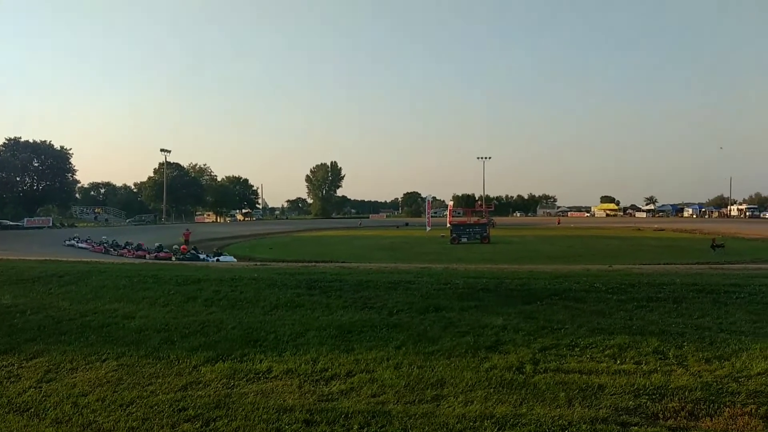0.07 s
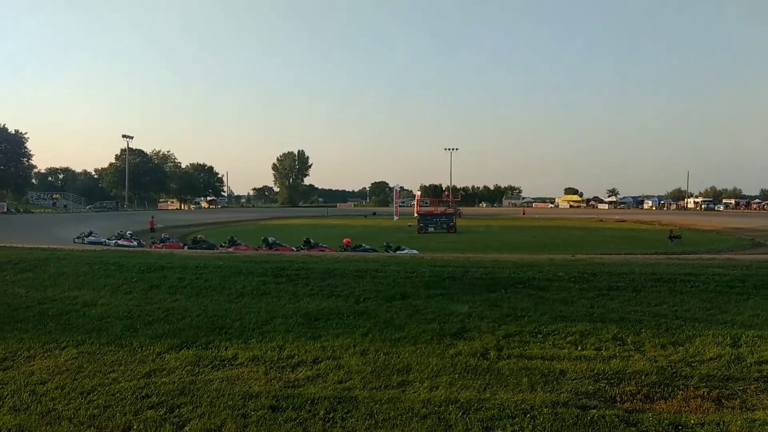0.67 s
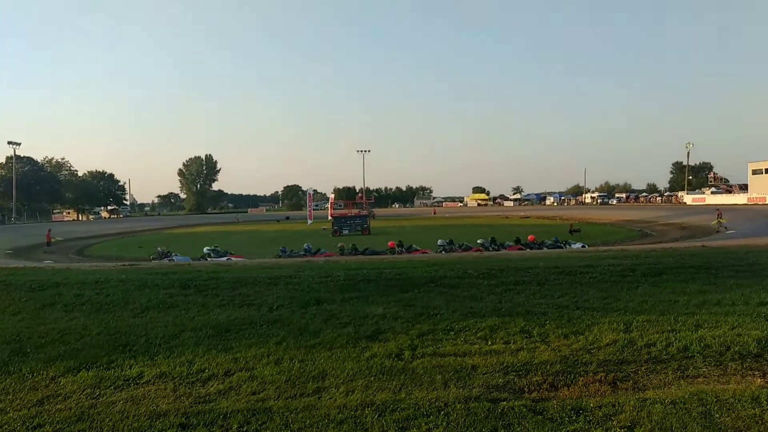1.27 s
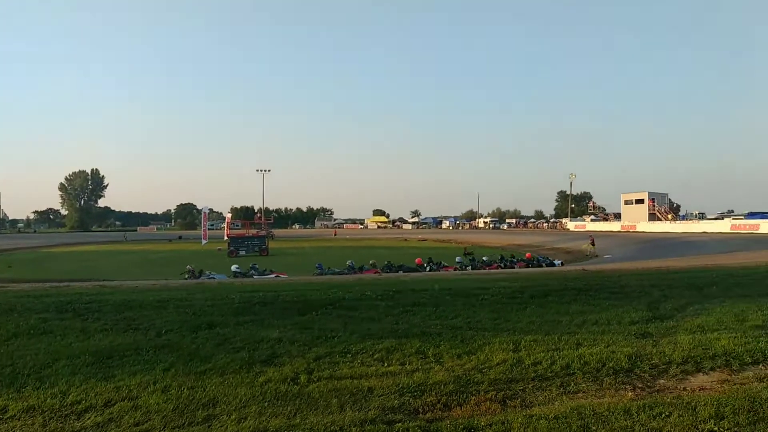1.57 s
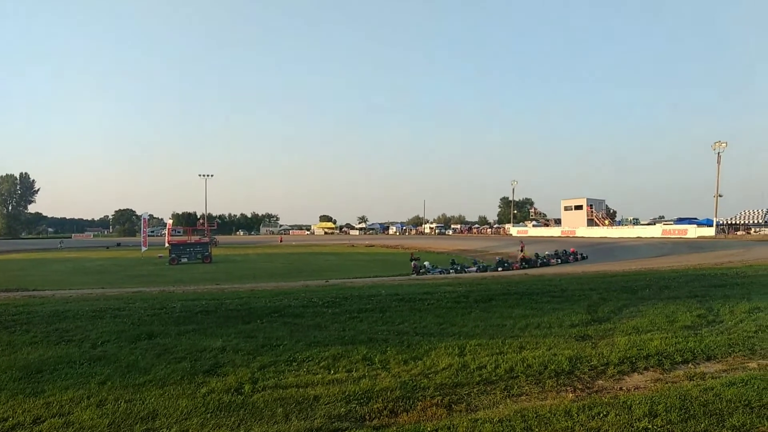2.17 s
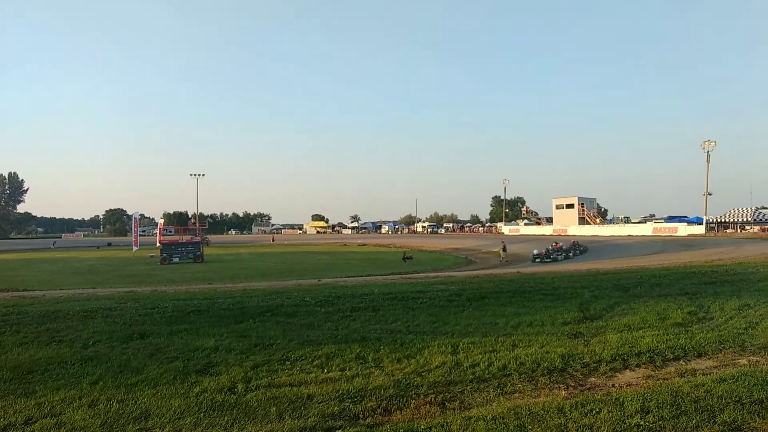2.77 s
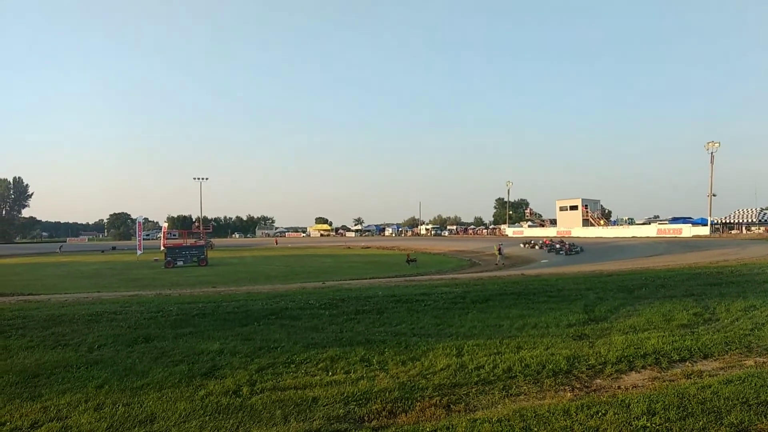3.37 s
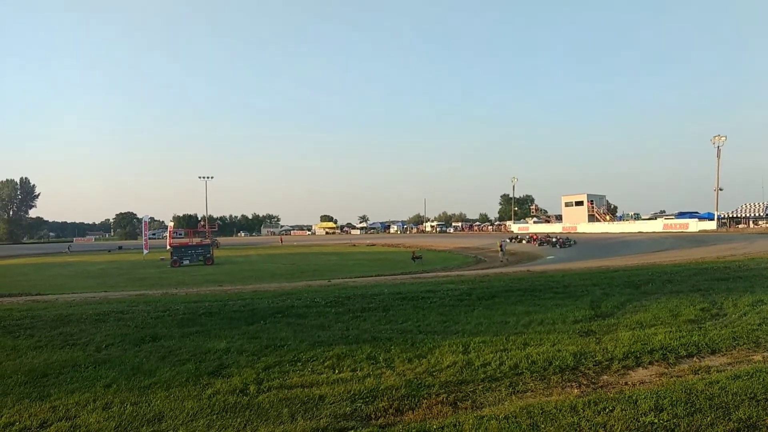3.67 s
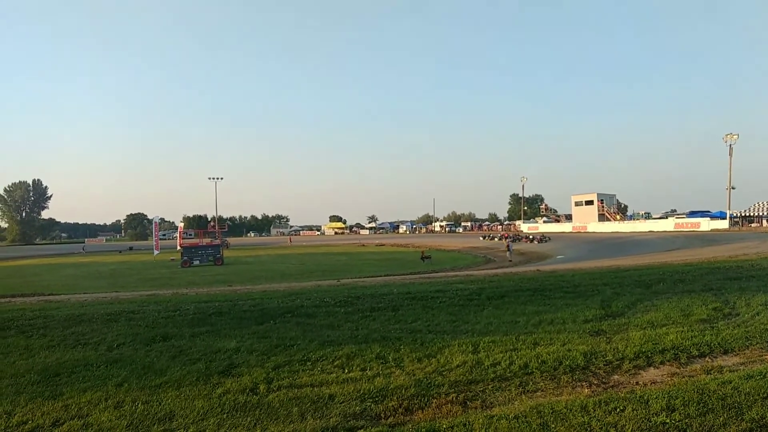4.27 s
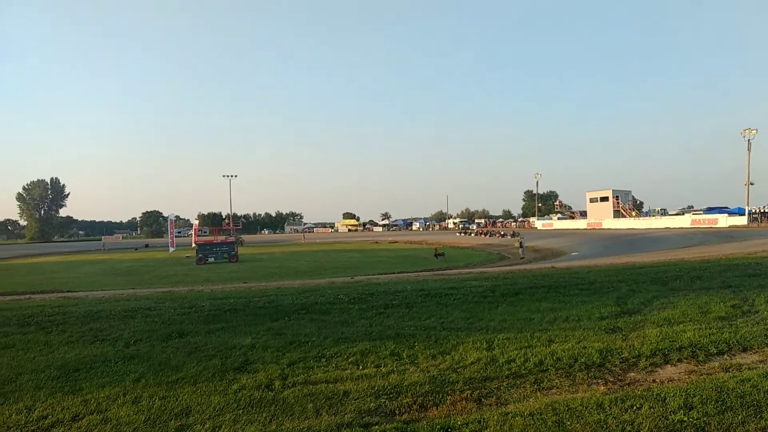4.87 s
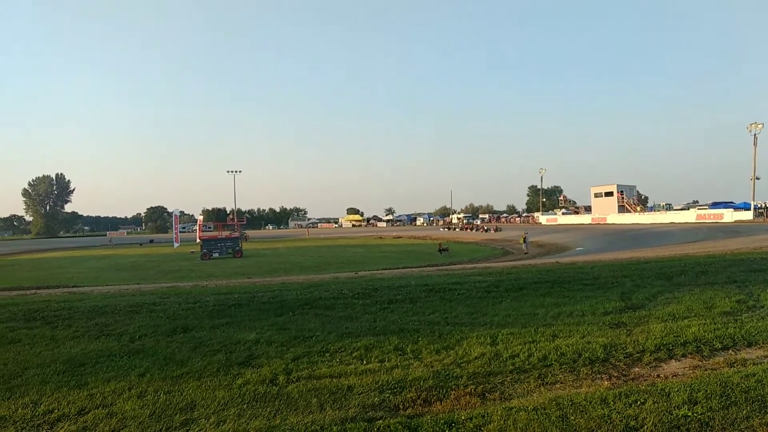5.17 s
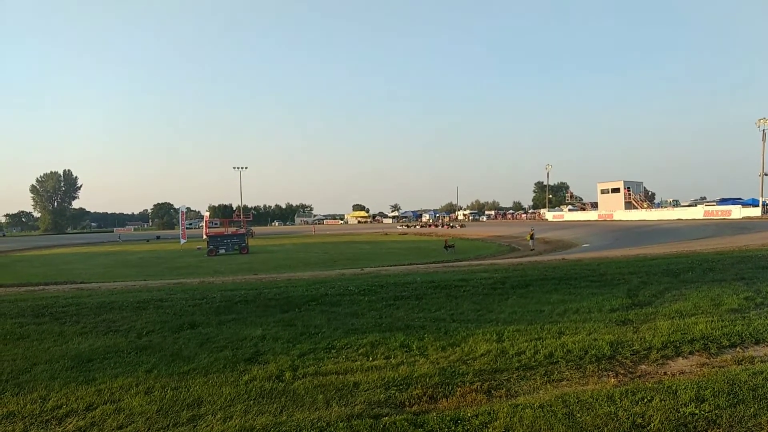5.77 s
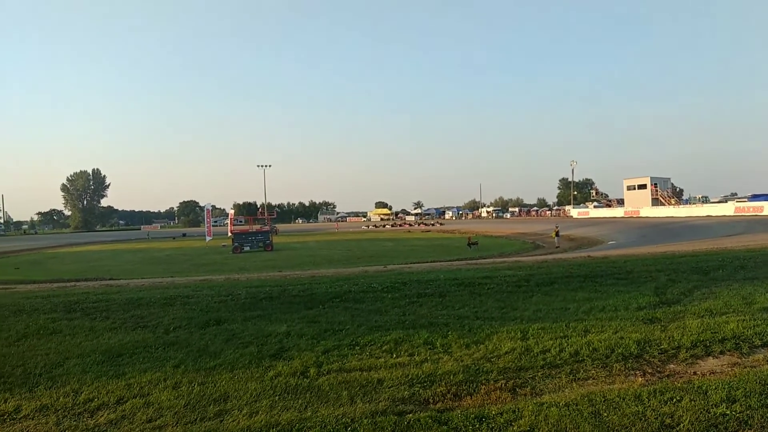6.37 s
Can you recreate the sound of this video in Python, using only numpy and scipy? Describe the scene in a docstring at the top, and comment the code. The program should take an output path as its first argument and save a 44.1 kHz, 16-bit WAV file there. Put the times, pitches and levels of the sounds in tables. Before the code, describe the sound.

A pack of small racing karts drones and throbs past outdoors, fades briefly in a turn, then speeds up farther away.

```python
"""On the grass outside a dirt oval, two closely spaced microphones hear a pack of racing karts pass,
round the turn and speed up on the far straight. Each single-cylinder four-stroke engine emits a pulse
train; their harmonics beat in a throbbing drone, the pressure steps growl and bark, and turbulent gas
rasps. Tyres spray dirt on the near pass, over light wind and a few sharp cracks. A thin whine rises
in the turn; then a hollow howl sinks and one exhaust pipe rings."""
import sys
import numpy as np
from scipy import signal
from scipy.fft import rfft, irfft, next_fast_len
from scipy.io import wavfile
from scipy.ndimage import uniform_filter1d

SR = 44100
rng = np.random.default_rng(int(sys.argv[2]) if len(sys.argv) > 2 else 0)


def store_wav(level_fs):
    """Save 16-bit WAV to argv[1]."""
    pcm = np.round(np.clip(np.atleast_2d(level_fs), -1, 1) * 32767)
    wavfile.write(sys.argv[1], SR, pcm.T.astype(np.int16))


N = 286975
TIME = np.arange(N) / SR
PADDED = next_fast_len(N + SR // 2)
HZ = np.maximum(np.fft.rfftfreq(PADDED, 1 / SR), 1)


def from_db(db):
    """Decibels to amplitude ratio."""
    return 10 ** (np.asarray(db) / 20)


def unit_rms(x):
    """Normalisation to unit power."""
    return x / np.sqrt(np.mean(x ** 2) + 1e-20)


def in_time(rows):
    """Linear interpolation of each column at every sample."""
    s, *columns = np.transpose(rows)
    return [np.interp(TIME, s, column) for column in columns]


def over_hz(points):
    """Linear interpolation on a log-frequency axis."""
    hz, value = np.transpose(points)
    return np.interp(np.log(HZ), np.log(hz), value)


def filtered(x, gain):
    """Filtering by multiplication of the spectrum."""
    return irfft(rfft(x, PADDED) * gain, PADDED)[..., :N]


def band(low_hz, high_hz, order=8):
    """Butterworth band-pass magnitude."""
    return 1 / np.sqrt((1 + (low_hz / HZ) ** (2 * order)) * (1 + (HZ / high_hz) ** (2 * order)))


def drift(rate_hz):
    """Random modulation: interpolated Gaussian values."""
    knots = rng.standard_normal(512)
    return np.interp(TIME * rate_hz, np.arange(len(knots)), knots)


def decay(clicks, seconds):
    """Exponential decay after each impulse."""
    return signal.lfilter([1], [1, -np.exp(-1 / (seconds * SR))], clicks + 1e-18)


def bell(s, length):
    """Half-cosine window centred on time s."""
    window = np.zeros(N)
    inside = abs(TIME - s) < length / 2
    window[inside] = np.cos(np.pi * (TIME[inside] - s) / length)
    return window


def swells(rows):
    """Sum of brief level changes, in dB."""
    return sum(db * bell(s, length) for s, length, db in rows)


def at_level(pair, db, seconds):
    """Gain control: the running RMS of the channels' mean follows db; faster detail survives."""
    size = int(seconds * SR)
    power = uniform_filter1d(uniform_filter1d(pair.mean(0) ** 2, size), size)
    return pair * from_db(db) / np.sqrt(np.maximum(power, 1e-20))


def tracking_band(pair, centre_hz, half_width_hz):
    """Heterodyne filtering: a narrow band follows a moving centre frequency."""
    carrier = np.exp(2j * np.pi * np.cumsum(centre_hz) / SR)
    low_pass = signal.butter(2, half_width_hz, fs=SR, output="sos")
    baseband = signal.sosfiltfilt(low_pass, pair * carrier.conj(), padtype="even", padlen=SR // 4)
    return 2 * np.real(carrier * baseband)


# level difference between the microphones (frequency [Hz], left minus right [dB])
BALANCE = [(60, 11), (85, 4), (130, -3), (175, -5), (230, -7.5), (450, -10), (850, -3.5), (1300, 0.7),
           (1800, -3), (2200, 0.9), (2600, -1.2), (4000, -2.5), (8500, -3), (10000, -3.5), (14000, -10.5)]
# phase difference added to the time lead (frequency [Hz], lead of the right side [rad])
PHASE_LEAD = [(100, -.56), (250, -.87), (430, -.9), (600, -2.3), (1000, -2.75), (1650, -2.5), (2200, -3.03),
              (3000, -2.92), (6000, -2.95), (6900, -3.3), (7600, -2.9), (9200, -3.35), (10200, -2.9)]
# diffuse share of the sound, with narrow gaps near 2.2 and 6.8 kHz (frequency [Hz], level re direct [dB])
DIFFUSE = [(100, -16), (280, -10), (450, -3), (900, -13), (1500, -9), (2200, -26), (2600, -8), (3300, -13),
           (4300, -12), (6100, -7), (6750, -15), (7300, -5), (10000, -10), (14000, -3)]
def outdoors(x, t60_s=0.19, wet_db=0, lead_s=.000447):
    """Partial coherence: direct sound arrives first on the right; a diffuse tail differs on each side."""
    share = from_db(over_hz(DIFFUSE) + wet_db)
    heard = rfft(x, PADDED) * from_db(over_hz(BALANCE) * [[.5], [-.5]]) / np.sqrt(1 + share ** 2)
    lead = np.exp(.5j * (2 * np.pi * HZ * lead_s + over_hz(PHASE_LEAD)))
    direct = irfft(heard * [lead.conj(), lead], PADDED)[:, :N]
    tail = rng.standard_normal((2, SR // 2)) * from_db(-60 * TIME[:SR // 2] / t60_s)
    tail /= np.linalg.norm(tail, axis=1, keepdims=True)
    diffuse = irfft(heard * share * rfft(tail, PADDED), PADDED)[:, :N]
    stretch_s = .0008 * drift(5)   # the diffuse sound's delay wanders as the karts move
    delayed = np.clip(np.round((TIME - stretch_s) * SR).astype(int), 0, N - 1)
    return direct + diffuse[:, delayed]


def firings(rates_hz, wander=.004, jitter_s=.00011, uneven_db=1.5, sway_db=2.0):
    """Quasi-periodic pulse trains: one pulse per combustion, varying in timing and strength."""
    pulses = np.zeros(N)
    for rate in rates_hz:
        cycles = rng.random() + np.cumsum(rate * (1 + wander * drift(3))) / SR
        at = np.flatnonzero(np.diff(np.floor(cycles)))
        late, strength = rng.standard_normal((512, 2))[:len(at)].T
        db = uneven_db * strength + sway_db * drift(2.16)[at]
        np.add.at(pulses, np.clip(at + (late * jitter_s * SR).astype(int), 0, N - 1), from_db(db))
    return pulses


# progress round the turn (time [s], position [0 near side, 1 far side])
TURN = [(1.9, 0.19), (3.4, 0.68)]
FAR = np.clip(in_time(TURN)[0], 0, 1)
# exhaust response on the near pass and on the far straight (frequency [Hz], gain [dB])
NEAR_RESPONSE = [(210, 6.5), (248, -5), (300, -4), (400, -10.5), (485, -11.5), (560, -15), (680, -12),
                 (810, -10.5), (1000, -13), (1250, -14.5), (1600, -16), (2000, -20), (2400, -31)]
FAR_RESPONSE = [(200, -7), (233, 10.5), (300, -4), (360, -13), (480, -19.5), (560, -15.5), (640, -9),
                (720, -25.5), (820, -16.5), (1000, -21.5), (1400, -22), (1750, -15.5), (2400, -28.5)]
def piped(x, dispersion=1.3):
    """Dispersion: the pipes delay the lows of each pulse. The timbre shifts through the turn."""
    delay = np.exp(-1j * dispersion * np.sqrt(HZ))
    near_side = filtered(x, delay * from_db(over_hz(NEAR_RESPONSE)))
    far_side = filtered(x, delay * from_db(over_hz(FAR_RESPONSE)))
    return (1 - FAR) * near_side + FAR * far_side


# karts in step (centre time [s], duration [s], frequency [Hz], nominal glide [Hz], peak level [dB])
THROBS = [(0.05, 0.14, 165, -1, -19), (0.13, 0.15, 127, 0, -24), (0.13, 0.44, 82, -2, -26),
          (0.26, 0.43, 166, 1, -24), (0.34, 0.25, 246, 0, -21), (0.41, 0.14, 208, -6, -24),
          (0.43, 0.15, 85, 7, -30), (0.5, 0.19, 248, 0, -21), (0.62, 0.08, 249, 13, -22),
          (0.62, 0.11, 207, -7, -24), (0.7, 0.31, 127, 2, -27), (0.75, 0.27, 247, 16, -19),
          (0.79, 0.11, 169, -16, -25), (0.81, 0.33, 210, -4, -26), (0.84, 0.37, 84, -1, -30),
          (0.97, 0.15, 169, 2, -24), (1.03, 0.16, 248, 6, -25), (1.1, 0.14, 211, 11, -26),
          (1.17, 0.23, 249, -10, -24), (1.2, 0.22, 88, 4, -32), (1.24, 0.1, 168, -6, -26),
          (1.28, 0.18, 127, -2, -27), (1.39, 0.11, 125, -2, -23), (1.41, 0.19, 247, -16, -23),
          (1.49, 0.27, 86, -4, -32), (1.51, 0.19, 124, 11, -25), (1.69, 0.15, 164, 6, -27),
          (1.71, 0.09, 252, 12, -26), (1.74, 0.41, 88, 1, -34), (1.77, 0.06, 249, -16, -23),
          (1.82, 0.09, 246, 5, -25), (2.04, 0.23, 128, 8, -27), (2.04, 0.26, 85, 3, -33),
          (2.05, 0.25, 167, -16, -28), (2.07, 0.08, 252, -9, -23), (2.15, 0.11, 246, 8, -24),
          (2.2, 0.22, 165, 15, -27), (2.54, 0.16, 126, -1, -26), (2.55, 0.16, 84, 5, -34),
          (2.76, 0.16, 130, -7, -30), (2.8, 0.2, 86, 5, -37), (2.89, 0.16, 131, 15, -32),
          (3.11, 0.15, 130, -4, -29), (3.12, 0.17, 86, -1, -34), (3.2, 0.12, 219, 0, -31),
          (3.29, 0.16, 169, 3, -27), (3.3, 0.11, 217, -8, -25), (3.31, 0.18, 130, 11, -26),
          (3.32, 0.3, 86, 0, -32), (3.45, 0.12, 131, 5, -31), (3.54, 0.24, 173, 8, -31),
          (3.55, 0.08, 219, -7, -28), (3.69, 0.26, 215, 6, -28), (3.71, 0.24, 131, -4, -26),
          (3.86, 0.6, 87, 1, -36), (3.87, 0.17, 132, 5, -23), (4.0, 0.18, 261, 1, -29),
          (4.02, 0.2, 132, 7, -28), (4.07, 0.17, 228, -9, -24), (4.11, 0.26, 176, 2, -29),
          (4.21, 0.14, 226, 4, -23), (4.25, 0.26, 90, 6, -34), (4.3, 0.17, 132, 15, -28),
          (4.31, 0.12, 226, 5, -27), (4.48, 0.27, 135, 7, -23), (4.48, 0.33, 90, 3, -30),
          (4.48, 0.37, 227, 16, -27), (4.67, 0.13, 235, 5, -27), (4.74, 0.12, 92, -10, -32),
          (4.74, 0.19, 133, -1, -28), (4.79, 0.16, 233, 10, -25), (4.9, 0.23, 93, -4, -31),
          (4.9, 0.31, 182, 9, -29), (4.91, 0.13, 231, 16, -27), (4.91, 0.24, 141, 4, -25),
          (5.07, 0.08, 232, -3, -22), (5.08, 0.17, 276, -9, -28), (5.19, 0.18, 232, 11, -25),
          (5.21, 0.27, 139, -10, -28), (5.36, 0.14, 93, 1, -31), (5.42, 0.22, 235, 5, -26),
          (5.47, 0.13, 137, 6, -28), (5.53, 0.07, 236, 8, -21), (5.53, 0.21, 97, 4, -34),
          (5.58, 0.14, 138, -8, -23), (5.71, 0.24, 236, 6, -25), (5.72, 0.15, 94, 0, -30),
          (5.74, 0.24, 144, 4, -26), (5.92, 0.15, 239, 0, -24), (5.95, 0.12, 143, 9, -26),
          (5.98, 0.17, 95, -4, -33), (6.03, 0.16, 238, -16, -25), (6.16, 0.32, 141, -11, -23),
          (6.21, 0.29, 100, -1, -33), (6.27, 0.09, 237, -15, -22), (6.35, 0.07, 236, 3, -20),
          (6.36, 0.38, 188, -11, -29), (6.41, 0.18, 94, 3, -30), (6.44, 0.11, 238, 16, -21),
          (6.44, 0.14, 143, -14, -27)]
def throbs(order, rate_hz, glide_share=.7, rival_db=-9.5, rival_detune=0.0565):
    """Constructive interference: karts in step swell into one note; a detuned rival beats with it."""
    note, swollen = np.zeros((2, N))
    rival = from_db(rival_db)
    for s, length, hz, glide_hz, db in THROBS:
        phase, rival_phase, side = rng.random(3)
        if round(hz / rate_hz[int(s * SR)]) == order:
            swell = bell(s, length)
            on = swell > 0
            cycles = np.cumsum(hz + glide_share * glide_hz * (TIME[on] - s) / length) / SR
            rival_cycles = cycles * (1 + rival_detune * np.sign(side - .5))
            tone = np.sin(2 * np.pi * (phase + cycles))
            tone += rival * np.sin(2 * np.pi * (rival_phase + rival_cycles))
            note[on] += from_db(db) * swell[on] * tone * np.sqrt(2 / (1 + rival ** 2))
            swollen += swell
    return note, np.minimum(swollen, 1)


# the pack's low drone (time [s], level [dB])
DRONE = [(0, -17.5), (.8, -22), (1.15, -23.5), (2.3, -23), (2.7, -28), (3.0, -29), (3.75, -26),
         (4.4, -24.5), (6.51, -23)]
# dips in the drone, mostly as karts fall out of step; at 2.67 s the level dips briefly just after the cracks
# (centre time [s], duration [s], level change [dB])
SAGS = [(1.6, 0.13, -1.5), (1.93, 0.12, -1), (2.67, 0.18, -2.5), (3.47, 0.15, -3.5), (4.61, 0.31, -3.5),
        (5.29, 0.23, -4), (5.84, 0.19, -2.5)]
# firing harmonics from the second up (offset [Hz], half-width [Hz], near gain [dB], far gain [dB])
HARMONICS = [(1.2, 8.4, -14.5, -16), (0.8, 14, -13, -10.5), (-0.63, 22, -9.5, -9.5), (0.49, 25, -17, -8),
             (0.28, 29, -7.5, -14.5), (0.64, 25.6, -21.5, -15.5)]
def drone(pulses, rate_hz, throb_db=-0.1, give_way=0.7, mutter_db=-12.0):
    """Superposition: detuned harmonics blur into a hum that yields to throbs; uneven firing mutters."""
    pair = outdoors(piped(pulses))
    level_db = in_time(DRONE)[0] + swells(SAGS)
    hum, notes = 0, 0
    for order, (offset_hz, half_width_hz, near_db, far_db) in enumerate(HARMONICS, start=2):
        fundamental_hz = rate_hz + offset_hz / order
        note, swollen = throbs(order, fundamental_hz)
        blur = tracking_band(pair, order * fundamental_hz, half_width_hz)
        harmonic_db = level_db + (1 - FAR) * near_db + FAR * far_db
        hum += at_level(blur, harmonic_db, 0.14) * (1 - give_way * swollen)
        notes += note
    throbbing = outdoors(notes, wet_db=-3.0)
    throbbing *= from_db(throb_db) * notes.std() / throbbing.mean(0).std()
    mutter = outdoors(filtered(pulses * rng.standard_normal(N), band(124, 187, order=4)))
    return hum + throbbing + at_level(mutter, level_db + mutter_db, 0.41)


def beat_level(depth_db=0.5):
    """Power addition: how far throbs and sags move the drone about its mean level, in dB."""
    throb_power = sum((from_db(db) * bell(s, length)) ** 2 for s, length, _, _, db in THROBS)
    drone_power = from_db(in_time(DRONE)[0]) ** 2
    db = 10 * np.log10(1 + from_db(depth_db) * throb_power / drone_power) + swells(SAGS)
    return db - db.mean()


def gas_bursts(pulses, decay_s, steady):
    """Turbulence: gas leaves the pipe in a burst after each firing, over steady flow noise."""
    power = decay(pulses ** 2, decay_s)
    return unit_rms(np.sqrt(power / power.mean() + steady) * rng.standard_normal(N))


# exhaust midrange, strong on the near pass (time [s], growl level [dB], bark level [dB])
MIDRANGE = [(0.08, -26.5, -26), (0.58, -25, -24.5), (1.25, -28.5, -26.5), (1.97, -28.5, -29),
            (2.51, -34, -35), (2.61, -43, -42), (2.93, -37.5, -38.5), (4.29, -32.5, -37),
            (4.58, -32.5, -38), (4.87, -31.5, -36), (6.33, -34, -37.5), (6.35, -33.5, -37)]
def growl_and_bark(pulses, beat_db, roughness=0.79, far_bark_db=-2.0):
    """Source and filter: pressure steps excite the pipes in two bands that throb with the drone."""
    growl_db, bark_db = in_time(MIDRANGE)
    roar = outdoors(piped(unit_rms(pulses) + roughness * gas_bursts(pulses, 0.028, steady=0.4)))
    growl = at_level(filtered(roar, band(339, 567)), growl_db + 0.42 * beat_db - .3, 0.1)
    bark_db += far_bark_db * FAR + 0.26 * beat_db + 0.39
    return growl + at_level(filtered(roar, band(690, 2600)), bark_db, 0.13)


# gas noise at the listener (frequency [Hz], spectrum level [dB])
RASP_SPECTRUM = [(2000, 5), (2700, -2), (3200, -3.5), (3700, -1), (4300, 3), (4900, -3), (5600, -10),
                 (7000, -26), (8300, -10.5), (9600, -5.5), (11000, -12), (12500, -28.5)]
# exhaust rasp and crackle, dipping suddenly just after the cracks at 2.6 s
# (time [s], rasp level [dB], crackle level [dB])
TREBLE = [(0.0, -38, -83), (0.5, -37, -70), (0.88, -35, -47.5), (2.14, -36.5, -39), (2.49, -37, -41.5),
          (2.64, -44.5, -47), (2.82, -41, -44.5), (3.6, -38, -44.5), (3.86, -37, -41.5), (4.02, -37.5, -45),
          (4.49, -36.5, -42.5), (4.63, -36.5, -46.5), (4.96, -34, -42), (5.46, -34.5, -44.5),
          (5.6, -32, -42), (6.0, -34.5, -43.5), (6.45, -34, -47.5)]
# surges of rasp (centre time [s], duration [s], level change [dB])
SURGES = [(1.77, 0.1, 2), (1.97, 0.21, 3.5), (3.7, 0.058, 4.5), (3.86, 0.098, 3.5), (4.27, 0.41, 2),
          (5.12, .1, 2.5)]
def rasp_and_crackle(blasts, beat_db, sputter_db=6.5, throb_share=0.12):
    """Pulsed jet noise: short gas bursts rasp, and still shorter ones crackle above them."""
    rasp_db, crackle_db = in_time(TREBLE)
    colour = from_db(over_hz(RASP_SPECTRUM))
    puffs = gas_bursts(blasts ** 1.36, 0.0034, steady=0.22)
    rasp = outdoors(filtered(puffs, colour * band(2340, 7400)))
    sputter = from_db(sputter_db * np.clip(rng.standard_normal(N), -2, 1.4))   # some firings snap harder
    snaps = gas_bursts(sputter * blasts ** 1.05, 0.00085, steady=0.48)
    crackle = outdoors(filtered(snaps, colour * band(7600, 12000)))
    throb_db = throb_share * beat_db
    rasp = at_level(rasp, rasp_db + swells(SURGES) + throb_db, 0.29)
    return rasp + at_level(crackle, crackle_db + throb_db - .7, 0.83)


# dirt thrown by the tyres (time [s], relative level [dB])
SPRAY = [(0, -62.5), (.35, -61), (.95, -51.5), (2.4, -53.5), (2.65, -65), (3.35, -61), (4.4, -67),
         (5.7, -66), (6.51, -75)]
# timbre of the spray (frequency [Hz], spectrum level [dB])
GRIT_SPECTRUM = [(3000, -22), (5000, 6), (7000, -30), (9600, 7), (12500, 2), (15500, 16)]
def dirt_spray(grains_per_s=1500, size_db=14.0, hiss=0.99, surge_db=-1.5, gain_db=6.8):
    """Shot noise: grains of all sizes patter at random in a fine hiss, thrown in quick surges."""
    impacts = rng.random(N) < grains_per_s / SR
    sizes = from_db(size_db * np.minimum(rng.exponential(1, N), 4))
    grains = impacts * sizes * rng.choice([-1, 1], N)
    spray = (unit_rms(grains) + hiss * rng.standard_normal(N)) * from_db(surge_db * drift(60))
    heard = outdoors(filtered(spray, from_db(over_hz(GRIT_SPECTRUM)) * band(4000, 11800)))
    return at_level(heard, in_time(SPRAY)[0] + gain_db, 0.13)


# light wind (time [s], level [dB])
WIND = [(0, -48), (2.7, -60), (4.9, -52), (6.51, -49)]
# its rumble (frequency [Hz], spectrum level [dB])
WIND_SPECTRUM = [(15, -20), (30, -10), (48, 13), (60, 7), (72, 6), (90, -8), (300, -63)]
def wind(left_db=2.0):
    """Low-frequency pressure noise of moving air, stronger on the left microphone."""
    air = filtered(rng.standard_normal(N), from_db(over_hz(WIND_SPECTRUM)))
    return at_level(air * from_db([[left_db], [-left_db]]), in_time(WIND)[0], .4)


# lone sharp cracks (time [s], relative peak level [dB])
CRACKS = [(1.2531, -19), (1.3025, -27), (1.5474, -10), (1.6697, -21), (2.2005, -15), (2.2923, -12),
          (2.4808, -14), (2.5022, -10.5), (2.5486, -12), (2.57, -11), (3.2715, -13), (3.3893, -13),
          (4.346, -11), (4.8734, -13), (5.0495, -14)]
def cracks(gain_db=6.0, decay_s=0.0013):
    """Transients: rapidly decaying noise is heard as bright snaps."""
    clicks = np.zeros(N)
    for s, db in CRACKS:
        clicks[round(s * SR)] = from_db(db + gain_db)
    snaps = decay(clicks, decay_s) * rng.standard_normal(N)
    return outdoors(filtered(snaps, from_db(over_hz(RASP_SPECTRUM)) * band(6900, 15000, order=3)))


# thin whine in the turn (time [s], frequency [Hz], level [dB])
WHINE = [(2.2, 835, -90), (2.36, 842, -45), (2.5, 851, -42.5), (2.8, 890, -45), (3.0, 916, -45),
         (3.33, 973, -45), (3.41, 981, -48), (3.5, 990, -90)]
def whine(waver=0.0035):
    """Frequency modulation: a nearly pure tone wavers as it glides upward."""
    hz, db = in_time(WHINE)
    tone = np.sin(2 * np.pi * np.cumsum(hz * (1 + waver * drift(25.6))) / SR)
    return outdoors(unit_rms(tone) * from_db(db), wet_db=2)


# exhaust howl on entering the far straight (time [s], nominal centre [Hz], level [dB])
HOWL = [(3.0, 826.6, -66), (4.15, 800.7, -40.5), (4.95, 814, -48), (5.4, 660, -47), (5.9, 670, -43),
        (6.51, 619.8, -70)]
def howl(pulses, tuning=0.94, half_width_hz=45):
    """A formant: one narrow band of engine overtones stands out and slides down."""
    hz, db = in_time(HOWL)
    return at_level(tracking_band(outdoors(piped(pulses)), tuning * hz, half_width_hz), db, 0.1)


# one pipe's lower resonance and its briefly flaring upper one (time [s], centre [Hz], level [dB])
LOWER_RING = [(4.2, 3200, -60), (5.4, 3220, -46), (5.64, 3220, -36.5), (5.8, 3200, -39.5),
              (6.05, 3150, -39.5), (6.17, 3120, -44), (6.51, 2950, -41)]
UPPER_RING = [(5.3, 3850, -75), (5.54, 3820, -39), (5.66, 3780, -39), (5.76, 3780, -50), (6.51, 3700, -55)]
def pipe_ring(start_hz=42.5, climb_hz_per_s=3.0, t60_s=.09, half_width_hz=210):
    """Forced resonance: an accelerating kart's overtones rise through two sinking pipe resonances."""
    rate_hz = start_hz + climb_hz_per_s * np.maximum(TIME - LOWER_RING[0][0], 0)
    pulses = firings([rate_hz], wander=.001, jitter_s=.00001, uneven_db=1.0, sway_db=1.0)
    # reflections run the single firings together
    reflections = rng.standard_normal(SR // 4) * from_db(-60 * TIME[:SR // 4] / t60_s)
    heard = outdoors(filtered(pulses, rfft(reflections, PADDED)), wet_db=-2.0)
    return sum(at_level(tracking_band(heard, hz, half_width_hz), db, 0.3)
               for hz, db in (in_time(LOWER_RING), in_time(UPPER_RING)))


# the pack starts bunched, strings out and accelerates (time [s], firing rate [Hz], spread [fraction])
FIRING_RATE = [(0, 39.3, 0.023), (.8, 42.1, .026), (1.4, 39.5, 0.044), (2.5, 43.7, .05), (3.3, 41.9, 0.047),
               (4.05, 43.4, .052), (5.0, 46.2, .055), (5.7, 45, .054), (6.51, 49, 0.055)]
# seven groups of karts within that spread (pace [-1 slowest, 1 fastest])
GROUP_PACE = [-1.0, -.55, -.3, -.05, .25, .6, 1.0]
# the pack moves across from the left (time [s], left minus right [dB])
BEARING = [(0, 3.5), (.7, 3.5), (1.5, 2.5), (2.5, -0.8), (4, -0.5), (6.51, 0.5)]
def scene(karts_per_group=2, raspy_db=5.0, raspy_lead=.018, nearest_db=6.0, nearest_lag=.021):
    """Superposition of all sources; a faster kart rasps, a slower, nearer one recedes in the turn."""
    rate_hz, spread = in_time(FIRING_RATE)
    raspy = firings([rate_hz * (1 + raspy_lead)], uneven_db=1.57, sway_db=2.5)
    nearest = firings([rate_hz * (1 - nearest_lag)],
                      wander=.002, jitter_s=.00005, uneven_db=2.0, sway_db=1.5)
    pack = firings([rate_hz * (1 + spread * pace) for pace in GROUP_PACE] * karts_per_group)
    pulses = pack + raspy + from_db(nearest_db) * (1 - FAR) / (1 - FAR[0]) * nearest
    beat_db = beat_level()
    midrange = growl_and_bark(pulses, beat_db)
    treble = rasp_and_crackle(pack + from_db(raspy_db) * raspy, beat_db)
    pan = from_db(in_time(BEARING)[0] * [[.5], [-.5]])
    engines = (drone(pulses, rate_hz) + midrange + howl(pulses)) * pan + treble + pipe_ring()
    return engines + dirt_spray() + cracks() + whine() + wind()


def record(dry, cutoff_hz=15850):
    """Band limiting: a steep low-pass removes the highest treble."""
    return filtered(dry, 1 / np.sqrt(1 + (HZ / cutoff_hz) ** 300))


dry = scene()
out = record(dry)
store_wav(out)
```